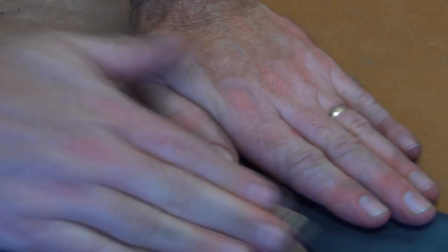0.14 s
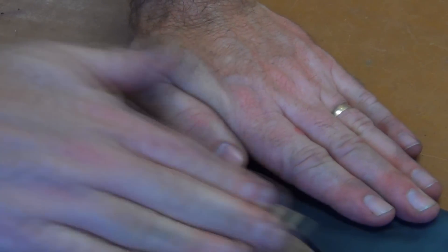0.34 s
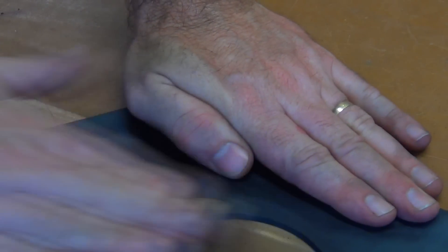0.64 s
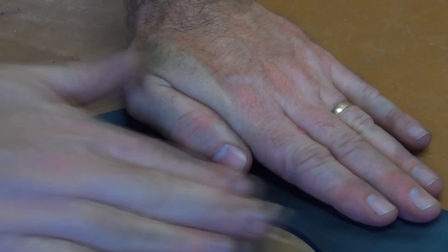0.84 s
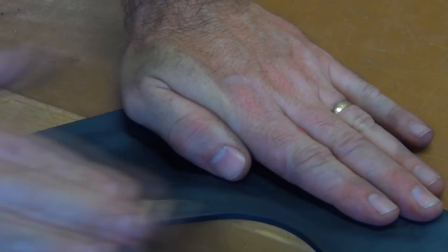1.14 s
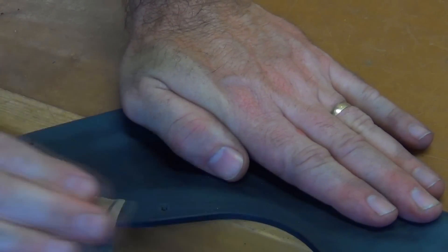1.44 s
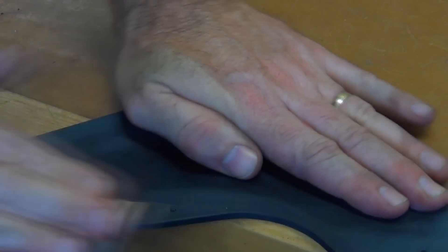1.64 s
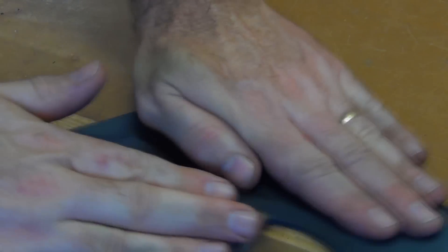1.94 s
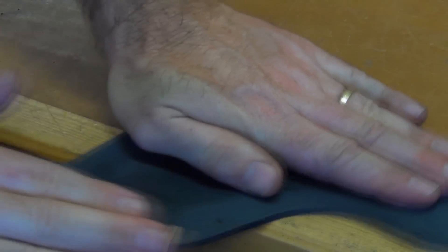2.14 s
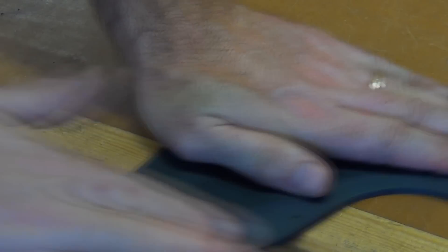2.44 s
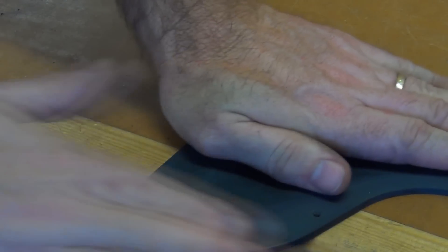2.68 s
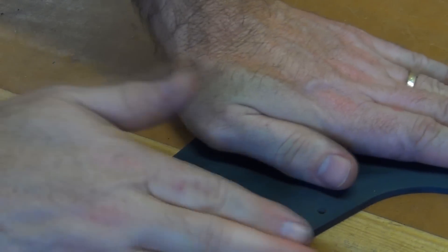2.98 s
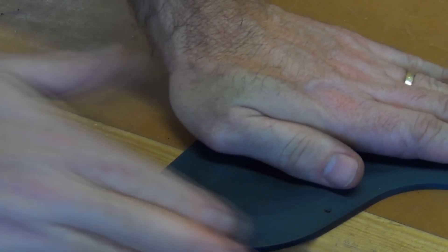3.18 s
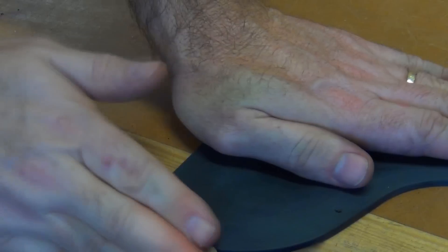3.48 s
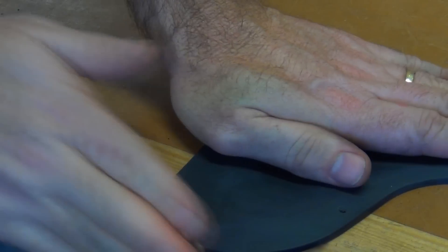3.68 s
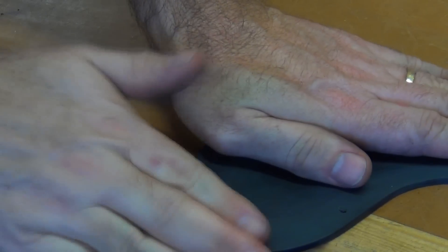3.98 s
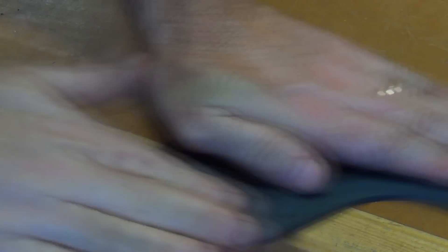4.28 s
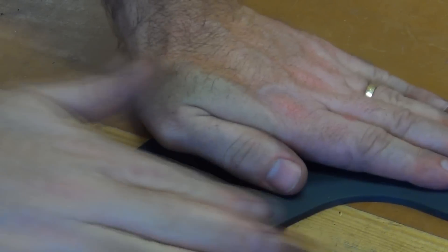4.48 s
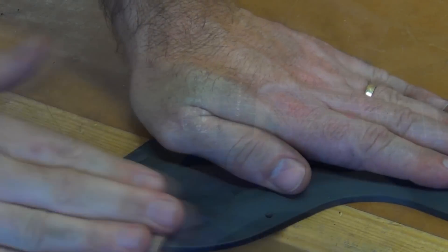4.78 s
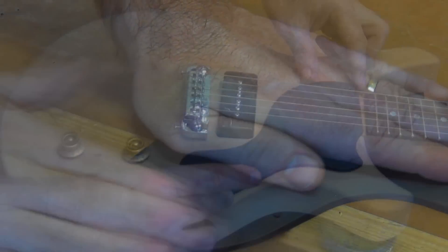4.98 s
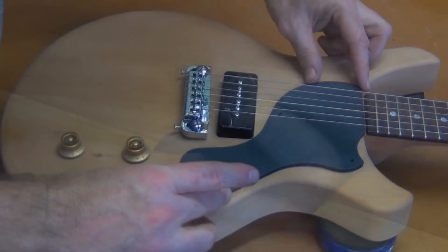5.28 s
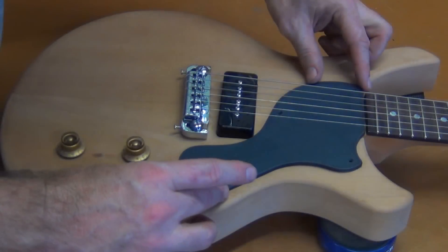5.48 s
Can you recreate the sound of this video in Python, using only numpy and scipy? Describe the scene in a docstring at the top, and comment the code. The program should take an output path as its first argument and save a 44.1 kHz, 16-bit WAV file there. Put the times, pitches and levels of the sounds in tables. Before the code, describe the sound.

From the very start, a flat plastic plate is rubbed quickly back and forth on sandpaper lying on a wooden workbench, at about eight strokes a second. Each stroke is a bright, gritty hiss with a rasp and a dull drag beneath it, dipping at each turn. The bench murmurs faintly and bumps softly on the pushes, most around 1.4 seconds. Now and then the plate catches with a tiny judder or chirr. At about 2 seconds the rhythm falters briefly with a low judder, then carries on with a slightly hollower ring. The strokes ease a little around 3.5 seconds and are brighter and stronger from about 4.2 to 5 seconds. After 5.3 seconds a few much weaker strokes fade out, ending near 5.6 seconds. The sound is close and centred, in a small room with a faint low hum.

```python
"""A flat plastic plate rubbed to and fro by hand on abrasive paper on a wooden bench, about 8 strokes/s.
Thousands of grit points scratch it: bright hiss, rasp, dull drag and a hollow ring, dipping at each turn.
The bench murmurs, each push starts with a soft bump, and now and then the plate catches and judders.
Small room, faint hum; the last strokes fade away."""
import sys
import numpy as np
from scipy import signal
from scipy.fft import rfft, irfft, next_fast_len
from scipy.io import wavfile

SR = 44100
rng = np.random.default_rng(int(sys.argv[2]) if len(sys.argv) > 2 else 0)


def digitize_waveform(pressure):
    """Quantize a signal to 16-bit integers and store it at the path in sys.argv[1].

    Rows of a 2-D input are taken as channels; values are limited to [-1, 1].
    """
    field = np.atleast_2d(pressure).T
    bounded = np.clip(field, -1, 1)
    quanta = np.round(bounded * 32767).astype(np.int16)
    wavfile.write(sys.argv[1], SR, quanta)


N = 247842
TIME = np.arange(N) / SR

# pull and push in turn, each lasting until the next: start_s, rise_s, hiss_db, rasp_db, bright_db
STROKES = [(-0.036, 0.06, -29, -41.5, -4), (0.081, 0.021, -33.5, -45.5, -2),
           (0.196, 0.018, -30, -42.5, -2.5), (0.337, 0.022, -33.5, -47, -4),
           (0.434, 0.09, -28.5, -44.5, -2), (0.6, 0.022, -29, -42.5, -2.0),
           (0.712, 0.059, -27.5, -41.5, -1), (0.857, 0.009, -30.5, -42, 1),
           (0.968, 0.047, -25.5, -41, -0.5), (1.101, 0.011, -28, -41.5, 0.0),
           (1.213, 0.026, -28.0, -41.5, 0.5), (1.345, 0.004, -28, -42.5, -0.5),
           (1.456, 0.033, -27.5, -42.5, -0.0), (1.59, 0.016, -27, -42.5, -1.5),
           (1.704, 0.0088, -28, -42, -1), (1.827, 0.073, -26, -40.5, -2), (1.97, 0.02, -34.5, -39.5, -4.5),
           (2.039, 0.0018, -46.5, -52.0, -8), (2.114, 0.14, -28, -40, 0.5), (2.276, 0.06, -32, -43.0, -3.5),
           (2.412, 0.01, -30.0, -43.5, -1.5), (2.537, 0.031, -28.5, -41.5, -2),
           (2.658, 0.0085, -30, -43, -1.5), (2.783, 0.017, -28, -41.5, 0), (2.902, 0.016, -30.5, -43, 0),
           (3.033, 0.025, -31.5, -44.5, -3.5), (3.147, 0.012, -28, -43, -3), (3.277, 0.026, -28, -44, -3.5),
           (3.376, 0.025, -31.0, -45.5, -3.5), (3.513, 0.045, -35.5, -49, -4),
           (3.639, 0.024, -32.5, -45.5, -2), (3.767, 0.044, -28, -42.0, -1.5),
           (3.889, 0.011, -32.0, -48, -2.5), (4.007, 0.035, -28.5, -43, -1),
           (4.135, 0.037, -31.0, -42.5, 0.5), (4.243, 0.031, -24.5, -41, -2),
           (4.362, 0.046, -31.5, -39.5, -2), (4.486, 0.02, -26.5, -41, -0.5),
           (4.598, 0.033, -29.5, -40, 1.5), (4.718, 0.018, -25, -42, 0.5), (4.83, 0.0059, -29, -42, 0.5),
           (4.95, 0.027, -28.5, -46.5, 2), (5.062, 0.0068, -30, -46, 1.0), (5.17, 0.024, -31.5, -45.5, -2),
           (5.343, 0.038, -49, -56, -4), (5.406, 0.017, -49.5, -57.5, -4), (5.506, 0.023, -42, -57.0, -1.5)]


def from_db(db):
    """Decibels to gain."""
    return 10 ** (np.asarray(db) / 20)


def rms_one(x):
    """Scale to unit power."""
    return x / np.sqrt(np.mean(x ** 2) + 1e-20)


def ease(x):
    """Quarter sine from 0 to 1, then steady."""
    return np.sin(np.pi / 2 * np.clip(x, 0, 1))


def in_time(points):
    """Control through (time_s, value) points."""
    return np.interp(TIME, *np.transpose(points))


def curve(points):
    """Gain function through (freq_hz, gain_db) points."""
    hz, db = np.transpose(points)
    return lambda f: from_db(np.interp(np.log(f), np.log(hz), db))


def colour(x, gain):
    """Filter by gain(freq_hz)."""
    size = next_fast_len(N + SR // 10)
    freq_hz = np.maximum(np.fft.rfftfreq(size, 1 / SR), 1)
    return irfft(rfft(x, size) * gain(freq_hz), size)[:N]


def above(f, edge_hz, order=14):
    """Soft step from 0 to 1 at edge_hz."""
    return .5 + .5 * np.tanh(order * np.log(f / edge_hz))


def drift(rate_hz):
    """Slow random wander, unit power."""
    hop = 40
    count = N // hop + 2
    f = np.fft.rfftfreq(count, hop / SR)
    spectrum = rfft(rng.standard_normal(count)) / (1 + (f / rate_hz) ** 2)
    slow = rms_one(irfft(spectrum, count))
    return np.interp(np.linspace(0, count - 1, N), np.arange(count), slow)


def drone(hz, width_hz):
    """Randomly driven narrow resonance, unit power."""
    phase = 2 * np.pi * hz * TIME
    return rms_one(drift(width_hz / 2) * np.sin(phase) + drift(width_hz / 2) * np.cos(phase))


def hands():
    """Plate speed (0-1) and the hiss, rasp and brightness (dB) set by the hands' weight."""
    jerk_share, jerk_s = 0.19, 0.0032   # the plate breaks loose with a jump in speed
    slowing_share, glide_power, last_stop_s = 0.48, 1.9, 5.65
    pull_lean_db, push_lean_db = (0.92, -3), (0.2, 1.7)   # weight shift over a stroke: hiss, rasp
    speed, hiss, rasp, bright = np.zeros((4, N))
    ends_s = [row[0] for row in STROKES[1:]] + [last_stop_s]
    for k, ((start_s, rise_s, hiss_db, rasp_db, bright_db), end_s) in enumerate(zip(STROKES, ends_s)):
        now = (TIME >= start_s) & (TIME < end_s)
        t = TIME[now] - start_s
        along = t / (end_s - start_s)
        setting_off = jerk_share * ease(t / jerk_s) + (1 - jerk_share) * ease(t / rise_s)
        speed[now] = setting_off * ease((1 - along) / slowing_share) ** glide_power
        hiss_lean_db, rasp_lean_db = push_lean_db if k % 2 else pull_lean_db
        from_middle = along - (1 - slowing_share / 2) / 2
        hiss[now] = hiss_db + hiss_lean_db * from_middle
        rasp[now] = rasp_db + rasp_lean_db * from_middle
        bright[now] = bright_db
    return speed, hiss, rasp, bright


def grit(speed, spread_db=1.5):
    """Uneven clicks as grains cut the plastic, denser at speed; unit power."""
    clicks_per_s = 30000 * (.12 + speed)
    chance = clicks_per_s / SR
    sizes = from_db(spread_db * np.minimum(rng.exponential(1, N), 5))
    signs = rng.choice([-1, 1], N)
    hits = rng.random(N) < chance
    return rms_one(sizes * signs * hits / np.sqrt(chance))


def scratch(speed, low_hz, high_hz, shift_db, bands):
    """Grit through one range of the plate's response; bands swell and sink as the contact moves."""
    # plate response: freq_hz, gain_db
    response = [(900, -20), (1500, -13), (2250, -11), (2700, -19.5), (4200, -18), (5200, -7.5), (6200, -4),
                (8000, 2), (9300, -0.5), (10500, -8), (12100, -16.5), (13200, -18.5), (14400, -18.5),
                (15800, -14.5)]
    rest = colour(grit(speed),
                  lambda f: curve(response)(f) * np.sqrt(above(f, low_hz) * (1 - above(f, high_hz))))
    out = np.zeros(N)
    for edge_hz in np.geomspace(low_hz, min(high_hz, 12000), bands + 1)[1:-1]:
        upper = colour(rest, lambda f: above(f, edge_hz))
        out += (rest - upper) * from_db(shift_db * drift(12.5))
        rest = upper
    return rms_one(out + rest * from_db(shift_db * drift(15)))


def sanding(speed, hiss_db, rasp_db, bright_db):
    """Plate on grit: hiss, rasp, drag and ring. Hiss needs speed most, so a slowing stroke dulls."""
    # drag re rasp, strongest during grip changes: time_s, level_db
    drag_levels = [(0, -7), (.7, -11.5), (1.75, -10.5), (2.15, -7), (2.55, -7.5), (2.72, -11), (4.9, -11),
                   (5.4, -5)]
    catching = from_db(0.78 * drift(280) + 0.5 * drift(15))   # stick-slip on the grit
    hiss = scratch(speed, 4970, 14560, shift_db=2.0, bands=4)
    top = colour(hiss, lambda f: above(f, 7440, order=3))
    tilt_db = 2.0 * bright_db + 11.6 * (speed - .8)
    hiss = from_db(tilt_db / 2) * top + from_db(-tilt_db / 2) * (hiss - top)
    hiss *= from_db(hiss_db + 0.05) * np.hypot(speed, .07)   # the plate still swivels at the turn
    rasp = scratch(speed, 2710, 4653, shift_db=2.0, bands=5)
    rasp *= from_db(rasp_db + 0.47) * np.hypot(speed, .05) ** 0.59
    drag = scratch(speed, 760, 3360, shift_db=1.5, bands=3)
    drag *= from_db(rasp_db + in_time(drag_levels)) * np.hypot(speed, .08) ** 0.52
    return catching * (hiss + rasp + drag + from_db(hiss_db) * ring(speed))


def ring(speed, pitch_hz=2650, stage_width_hz=420):
    """Grit excites the plate's main bending mode; two filter stages for steep sides."""
    # ring re stroke, freer as the grip changes: time_s, level_db
    levels = [(0, -47), (1.2, -27), (1.6, -24.5), (2.5, -22), (3.2, -28), (4.0, -25.5), (4.3, -31),
              (4.55, -18), (4.9, -22), (5.1, -23), (5.6, -22.5)]
    radius = np.exp(-np.pi * stage_width_hz / SR)
    mode = [1, 0, -1, 1, -2 * radius * np.cos(2 * np.pi * pitch_hz / SR), radius ** 2]
    ringing = signal.sosfilt([mode, mode], grit(speed))
    return from_db(in_time(levels)) * speed ** 0.5 * rms_one(ringing)


def bench(speed):
    """The bench top murmurs under the rubbing, with three hollow tones."""
    # bench response: freq_hz, gain_db
    response = [(70, -8), (120, 5.5), (200, 15), (330, 4.5), (480, 12.5), (700, -27), (950, 13.5),
                (1300, -17)]
    # hollow tones: pitch_hz, width_hz, level_db
    tones = [(464, 130, -58.5), (609, 42, -62), (762, 110, -62)]
    # drive of the tones, strongest with the plate far along the bench: time_s, gain_db
    drive = [(0, -8.5), (2.05, -21), (2.15, 0.5), (2.65, -5), (2.75, -6.5), (5.62, -25)]
    murmur = from_db(-62.5 + drift(21)) * rms_one(colour(grit(speed), curve(response)))
    hollow = sum(from_db(db) * drone(hz, width_hz) for hz, width_hz, db in tones)
    return (0.65 + 0.14 * speed) * (murmur + from_db(in_time(drive)) * hollow)


def background():
    """Still air and a wavering low hum."""
    # room noise spectrum: freq_hz, gain_db
    air_spectrum = [(20, -12), (40, -4), (75, 4.5), (130, 1.5), (250, -1.5), (600, 1), (2000, 0),
                    (8000, -6.5), (16000, -14.5)]
    # room hum: pitch_hz, width_hz, level_db
    hum_tones = [(94, 6.1, -70.5), (191.5, 5.5, -74.5), (291.4, 25, -75)]
    hum = sum(from_db(db) * drone(hz, width_hz) for hz, width_hz, db in hum_tones)
    air = rms_one(colour(rng.standard_normal(N), curve(air_spectrum)))
    return from_db(-55.5) * air + hum


def room(x, t60_s=0.26, level_db=-12.5, path_sets=3):
    """Scattered reflections, crossfaded among sets of paths as the hands move."""
    t = TIME[:SR // 3]
    shares = np.array([drift(4) for _ in range(path_sets)])
    shares /= np.sqrt(np.sum(shares ** 2, axis=0))
    out = np.zeros(N)
    for share in shares:
        response = rng.standard_normal(len(t)) * from_db(-60 * t / t60_s) * (t > .002)
        response /= np.sqrt(np.sum(response ** 2))
        out += signal.oaconvolve(x * share, response)[:N]
    return from_db(level_db) * out


def slips(middle_s, half_length_s, centre_hz, width_oct, cycles_per_slip=1.1):
    """Short run of uneven slips knocking a plate or bench resonance; higher ones chatter faster."""
    now = np.flatnonzero(np.abs(TIME - middle_s) < half_length_s)
    swell = np.cos(np.pi / 2 * (TIME[now] - middle_s) / half_length_s) ** 3
    draw, noise = rng.random((2, SR // 2))[:, :len(now)]
    clicks = (draw < centre_hz / cycles_per_slip / SR) + 0.11 * (noise - .5)
    edges_hz = centre_hz * 2 ** (np.array([-.5, .5]) * width_oct)
    resonance = signal.butter(2, edges_hz, "band", fs=SR, output="sos")
    out = np.zeros(N)
    out[now] = rms_one(signal.sosfilt(resonance, clicks * swell))
    return out


def bumps(delay_s=.034, gain_db=-11):
    """The plate bumps the bench softly at the start of each push."""
    # downward force of the hands: time_s, force_db
    force = [(0, -63), (.6, -52), (1.1, -47.5), (1.4, -43), (2.05, -60), (2.3, -56), (3.05, -50),
             (3.7, -63), (5.6, -77)]
    out = np.zeros(N)
    for start_s, *_ in STROKES[1::2]:
        force_db = np.interp(start_s, *np.transpose(force))
        bump = slips(start_s + delay_s, half_length_s=.068, centre_hz=216, width_oct=1.34)
        out += from_db(gain_db + force_db) * bump
    return out


def judders(gain_db=-6.5):
    """The plate catches now and then: low judders, high chirrs."""
    # catches: middle_s, half_length_s, centre_hz, level_db
    catches = [(0.12, 0.072, 420, -52), (0.26, 0.062, 6400, -28), (.531, 0.038, 890, -46.5),
               (0.552, 0.032, 3580, -36.5), (1.47, 0.031, 2880, -37.5), (1.65, 0.039, 610, -46),
               (1.941, 0.079, 1750, -38.5), (2.056, .024, 240, -41.5), (2.093, 0.048, 187, -48),
               (2.314, 0.045, 1820, -43), (2.34, .15, 664, -60), (2.601, 0.13, 624, -51),
               (2.848, .036, 582, -43.5), (2.932, 0.059, 4380, -38.5), (3.087, 0.033, 925, -53),
               (3.815, 0.081, 480, -53.5), (4.083, .055, 570, -47.5), (4.275, .052, 615, -52),
               (4.327, 0.032, 3930, -36.5), (5.231, .051, 650, -53.5)]
    # span of the resonances stirred: centre_hz, width_oct
    widths = [(220, 1.7), (480, 0.51), (650, 2.04), (1800, 0.87), (3500, .42)]
    out = np.zeros(N)
    for middle_s, half_length_s, centre_hz, level_db in catches:
        width_oct = np.interp(centre_hz, *np.transpose(widths))
        out += from_db(gain_db + level_db) * slips(middle_s, half_length_s, centre_hz, width_oct)
    return out


def scene():
    """Sanding in the centre; reflections and background add slight width."""
    # fade of bench and background: time_s, gain_db
    fade_points = [(0, 2), (5.1, 0.5), (5.35, -3), (5.62, -11.5)]
    # some width in the lows and at 6-8 kHz, nearly mono at 2-5 kHz and at the top: freq_hz, gain_db
    stereo_width = [(40, 8), (90, -1.5), (300, -0.5), (700, -4.5), (1100, -7.5), (1800, -42.5), (3500, -42),
                    (4800, -37), (5800, -3), (7000, -2.5), (8200, -4.5), (10000, -19.5), (12000, -40)]
    speed, hiss_db, rasp_db, bright_db = hands()
    fade = from_db(in_time(fade_points))
    work = sanding(speed, hiss_db, rasp_db, bright_db) + fade * bench(speed) + judders() + bumps()
    mid = work + room(work) + fade * background()
    side = colour(room(work) + from_db(-8.0) * fade * background(), curve(stereo_width))
    return np.array([mid + side, mid - side])


def record(dry, cutoff_hz=16000):
    """Steep low-pass."""
    return signal.sosfilt(signal.ellip(12, .1, 80, cutoff_hz, fs=SR, output="sos"), dry)


dry = scene()
out = record(dry)
digitize_waveform(out)
```